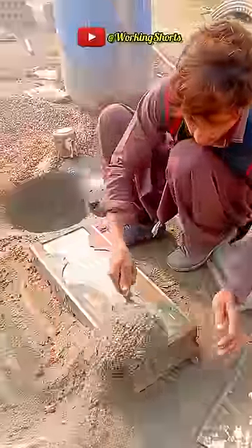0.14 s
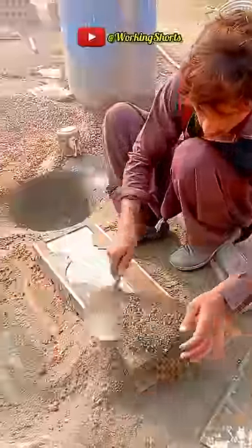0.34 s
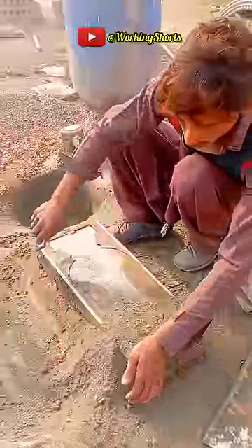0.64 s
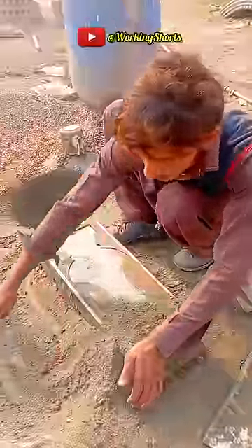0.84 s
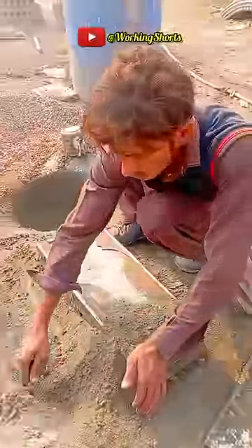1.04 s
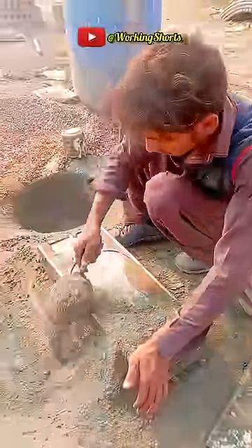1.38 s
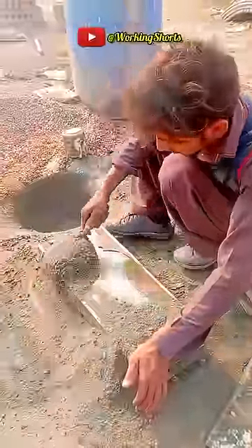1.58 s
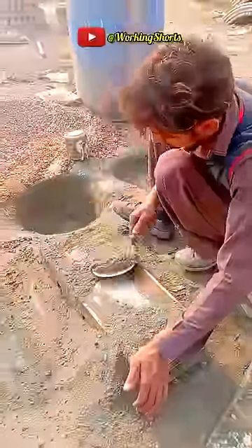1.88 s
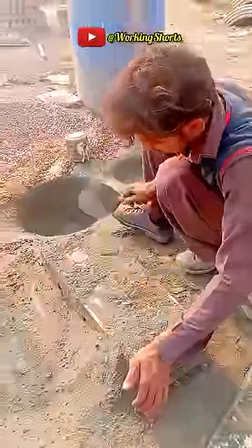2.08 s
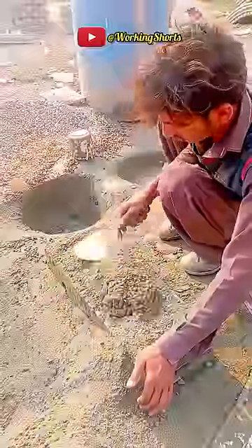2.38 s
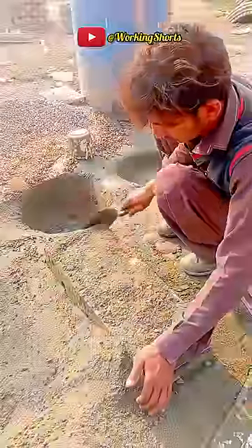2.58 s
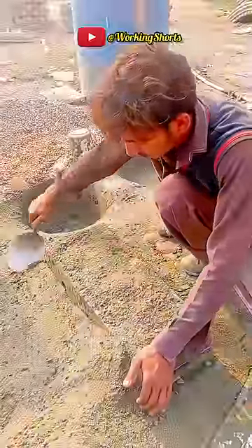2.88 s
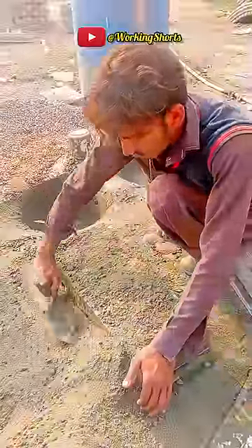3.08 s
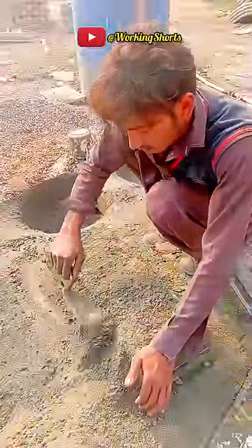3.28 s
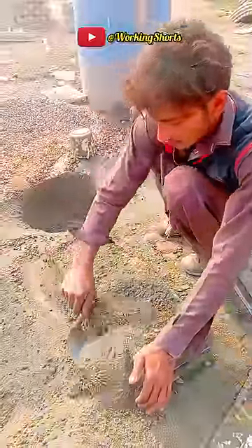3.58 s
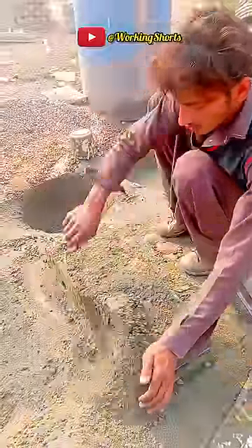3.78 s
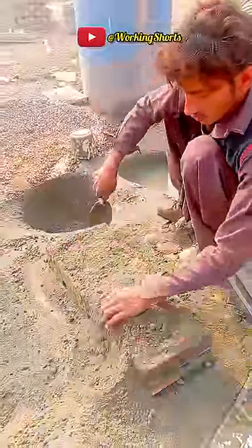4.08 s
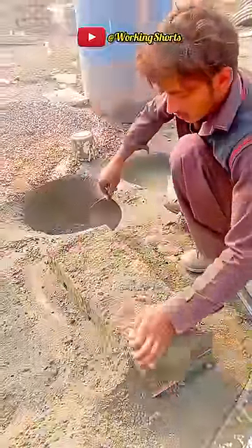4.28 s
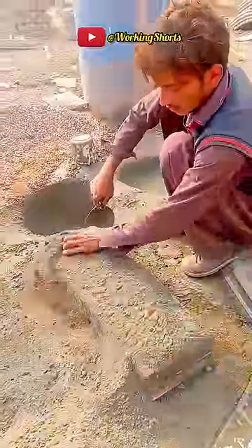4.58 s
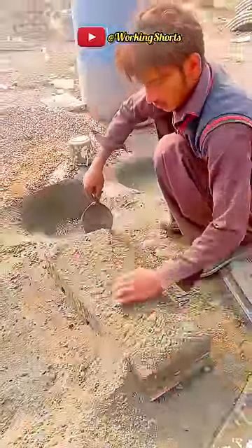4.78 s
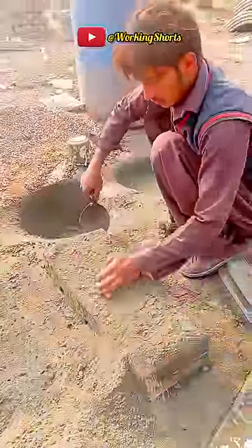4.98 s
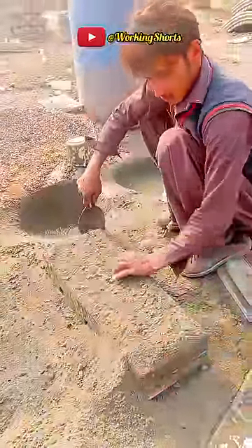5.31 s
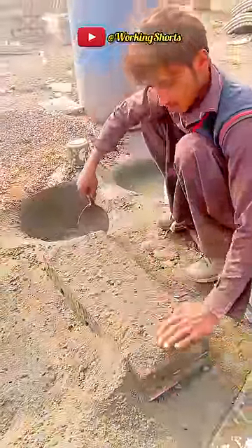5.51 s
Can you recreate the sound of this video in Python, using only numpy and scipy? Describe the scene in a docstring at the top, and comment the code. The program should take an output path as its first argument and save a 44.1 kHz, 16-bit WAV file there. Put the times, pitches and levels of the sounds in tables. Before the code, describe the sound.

In an open yard, a distant single-cylinder engine chugs as a low, soft throb of twenty to thirty beats a second, over a faint hiss. Close by, a light gritty tick comes at 0.25 s, then a steel trowel clinks on a metal mould at 0.6 s, chattering and ringing briefly. A short, rising sandy scrape follows at 0.9 s, a small swish at 1.2 s and a tick at 1.6 s. The engine slows, then jumps faster around 2.15 s. Dull thuds of concrete at 2.5-2.6 s lead into the loudest, brightest clank at 2.67 s. A longer harsh rasp swells from 2.95 to 3.2 s with soft thumps, while the engine sinks. Small scrapes and ticks come at 3.3-3.8 s, a thin, bright clink at 3.95 s, and a muffled knock at 4.17 s. Light ticks fade by 4.4 s; soft pats and gritty brushing close it from 5.1 s.

```python
"""A single-cylinder engine throbs some way off in an open work yard; close by, a steel trowel
scoops wet concrete into a metal mould. Sand grains rasp along the blade as filtered random snaps,
the blade clinks on the mould and rings in decaying modes until it is damped, loose concrete swishes
and dull thuds fall as noise bursts. The engine is one set of exhaust modes per firing, with gas
puffs and gear whine; a faint hiss lies behind."""
import sys
import numpy as np
from scipy import signal
from scipy.fft import rfft, irfft, next_fast_len
from scipy.io import wavfile
from scipy.ndimage import uniform_filter1d

SR = 44100
rng = np.random.default_rng(int(sys.argv[2]) if len(sys.argv) > 2 else 0)


def unload_audio(sound):
    """Save the sound as a 16-bit wav file, at the path given as the first command line argument."""
    columns = np.transpose(np.atleast_2d(sound))
    # keep every value between -1 and 1, then stretch to whole-number steps
    steps = np.round(np.clip(columns, -1, 1) * 32767)
    wavfile.write(sys.argv[1], SR, steps.astype(np.int16))


N = 249165
TIME = np.arange(N) / SR

# Engine speed. Each row: time in seconds, firings per second.
ENGINE_SPEED = [(0, 21.46), (.65, 21.02), (1.0, 22.83), (1.4, 23.02), (1.85, 19.36), (2.125, 18.3),
                (2.15, 30.3), (2.7, 29.76), (3.3, 23.95), (3.9, 21.98), (4.25, 22.75), (4.5, 25.76),
                (5.05, 28.8), (5.65, 20.1)]
# Likeness of the two microphones. Each row: frequency in Hz, likeness from 0 to 1.
LIKENESS = [(60, 0.89), (300, 0.88), (700, 0.46), (1500, 0.14), (3500, 0.05), (7000, 0.022), (16000, 0.062)]


def clinks(rise_s=0.00013, choke_s=0.008, yard_db=-23, yard_t60_s=0.34, ripple_db=6.0, beat_depth=0.37):
    """Each contact is a knock of the mould, a tick of steel on grit, and the blade's free ring."""
    # Blade modes. Each row: frequency in Hz, level in dB, t60 in seconds.
    blade_modes = [(1249, -16, .16), (1472, -9, .17), (1640, -11, .16), (1874, -12, .95), (2090, -12, .18),
                   (2509, -8, .13), (2709, 2, .13), (3360, -11, .12), (3564, -9, .13), (3796, -7, .39),
                   (4330, -13, .14), (4586, -1, .21), (5150, -18, .18), (5880, -17, .1), (6540, -15, .1),
                   (6820, -13, .11), (7553, -19, .15), (11670, -20, .1)]
    # Mould knock spectrum. Each row: frequency in Hz, level in dB.
    knock_spectrum = [(60, -26), (200, 6), (450, -5), (750, 1), (1000, -3.5), (1500, 1), (2800, -6.5),
                      (4500, -6.5), (8000, -21)]
    # Steel-on-grit spectrum. Each row: frequency in Hz, level in dB.
    tick_spectrum = [(500, -48), (3000, -30), (5500, -11), (7700, -2.5), (9500, 1), (11200, -2),
                     (13000, -6.5), (15000, -6.5), (17000, -26)]
    out = np.zeros((2, N))
    t = np.arange(2 * SR // 5) / SR
    hz, db, t60_s = np.transpose(blade_modes)[:, :, None]
    # higher modes reach the two microphones further out of step
    lag = np.arccos(np.clip(read(LIKENESS, hz), 0, 1))
    for s, knock_db, tick_db, contact_t60_s, ring_db, tilt_db, free_s, spot in contacts():
        phase = rng.uniform(0, 2 * np.pi, hz.shape)
        # bending waves shorten with the root of frequency; a mode struck on its node stays silent
        reach = np.cos(.2 * spot * np.sqrt(hz))
        modes = reach * amp(db + tilt_db * np.log2(hz / 3000)) * fade(t, t60_s)
        # close pairs of modes beat against each other
        beat_hz = rng.uniform(1.96, 34.3, hz.shape)
        modes = modes * (1 + beat_depth * np.sin(2 * np.pi * beat_hz * t))
        ring = np.array([(modes * np.sin(2 * np.pi * hz * t + phase + side * lag)).sum(0)
                         for side in (0, 1)])
        damping = np.exp(-np.maximum(t - free_s, 0) / choke_s)
        ring *= (1 - np.exp(-t / 0.01)) * damping
        knock = burst(t, knock_spectrum, contact_t60_s, rise_s, ripple_db / 2)
        knock = knock + amp(yard_db) * burst(t, knock_spectrum, yard_t60_s, 0.0104)
        tick = burst(t, tick_spectrum, contact_t60_s, rise_s, ripple_db)
        add(out, s, amp(knock_db) * knock + amp(tick_db) * tick + amp(ring_db) * ring)
    return out


def contacts(touches=3, rebound_s=0.0067, blow_t60_s=0.06, tap_tilt_db=16, tap_free_s=.075, tap_spot=0.867):
    """Every touch: a blow rings, then chatters in quick rebounds; a tap rings brightly and briefly."""
    # Free blade on the mould. Each row: start in seconds, knock level in dB, tick level in dB,
    # ring level in dB, ring tilt in dB per octave, seconds until damped,
    # spot struck from tip 0 to heel 1, change at each rebound in dB.
    blows = [(.5849, -12, -14, -24.5, -1, 0.31, 0.67, -9.5),
             (2.672, -9.5, -20.5, -14.5, 1, 0.275, 0.056, -8),
             (3.9452, -29.5, -11.5, -30, 8.5, .23, 0.745, -1.5),
             (4.173, -32.5, -31.5, -37, -2, 0.058, 0.95, -3.5)]
    # Loaded blade on a stone or the rim. Each row: start in seconds, tick level in dB,
    # knock level in dB, ring level in dB, contact t60 in seconds.
    taps = [(0.248, -39, -69, -75, 0.053), (0.634, -36, -35, -60, 0.038), (1.579, -27, -37.5, -71, 0.049),
            (2.143, -50, -41, -75, 0.016), (3.344, -33.5, -46, -70, .015), (3.403, -38, -41, -55.5, .07),
            (3.575, -22, -45, -63, 0.069), (3.775, -31, -41, -50, 0.058), (4.301, -36.5, -61, -76, 0.037),
            (4.341, -39, -52, -76, 0.038), (4.406, -42, -45, -56, 0.058)]
    for s, knock_db, tick_db, ring_db, tilt_db, free_s, spot, rebound_db in blows:
        for k in range(touches):
            touch_ring_db = ring_db if k == 0 else -np.inf
            change_db = k * rebound_db
            yield (s + k * rebound_s, knock_db + change_db, tick_db + change_db, blow_t60_s,
                   touch_ring_db, tilt_db, free_s, spot)
    for s, tick_db, knock_db, ring_db, t60_s in taps:
        yield s, knock_db, tick_db, t60_s, ring_db, tap_tilt_db, tap_free_s, tap_spot


def scrapes(grains_per_s=8000, spread_db=3, judder_db=3.5, plate_t60_s=0.023, ripple_db=5.5,
            cycles_per_s=5, screech_db=11, plates=3):
    """Sand grains snap against the blade, whose resonances keep shifting in a steady rotation."""
    # Strokes through the concrete. Each row: start in seconds, push in seconds,
    # release in seconds, peak pressure in dB.
    strokes = [(0.898, 0.065, .085, -20), (2.952, 0.23, .055, -21.5), (3.575, 0.011, 0.038, -29.5)]
    # Rasp spectrum. Each row: frequency in Hz, level in dB per Hz.
    rasp_spectrum = [(200, -25), (370, -12), (1500, -14), (2400, -16.5), (2750, -29.5), (3250, -10),
                     (4800, -11), (6200, -21), (7900, -3), (9200, -6.5), (12500, -8.5), (16000, -17.5)]
    pressure = sum(stroke(*row) for row in strokes)
    sizes = amp(spread_db * np.minimum(rng.exponential(1, N), 4)) * rng.choice([-1, 1], N)
    grains = sizes * (rng.random(N) < grains_per_s / SR)
    judder = amp(judder_db * unit(uniform_filter1d(rng.standard_normal(N), size=160)))  # stick and slip
    t = np.arange(SR // 16) / SR
    middle = len(t) // 2
    rasp = np.zeros((2, N))
    for k in range(plates):
        # random phases smear each snap in time; ripples give the plate its resonances
        smear = rfft(noise(len(t)) * np.roll(fade(t, plate_t60_s), middle))
        flat = irfft(smear / np.abs(smear), len(t))
        plate = unit(rippled(flat, ripple_db, spacing_hz=154.7))
        # the plates take turns
        share = np.maximum(np.cos(2 * np.pi * (cycles_per_s * TIME + k / plates)), 0)
        snaps = (grains * judder * share)[None]
        rasp += signal.oaconvolve(snaps, plate, axes=1)[:, middle:][:, :N]
    # under high pressure the steel edge screeches: this part grows with pressure squared
    screech = amp(screech_db) * unit(colour(rasp, hump(7040, 0.23))) * pressure
    return (unit(colour(rasp, rasp_spectrum)) + screech) * pressure


def stroke(start_s, push_s, release_s, peak_db, bite_s=0.0019, push_db_per_s=76, release_db=-24):
    """Pressure on the blade: the edge bites, digs in steadily, and lifts out ever faster."""
    past_peak_s = TIME - start_s - push_s
    push_part_db = push_db_per_s * np.minimum(past_peak_s, 0)
    lift_part_db = release_db * np.clip(past_peak_s / release_s, 0, 2) ** 2
    bite = np.clip((TIME - start_s) / bite_s, 0, 1)
    return bite * amp(peak_db + push_part_db + lift_part_db)


def crumbs(grit_db=3):
    """Loose concrete slides off the blade or under the hand: soft gritty noise swishes."""
    # Each row: start in seconds, length in seconds, level in dB before the fades, centre in Hz,
    # octaves from the centre to -6 dB.
    swishes = [(0.124, 0.063, -47.5, 1890, 1.14), (1.23, 0.062, -36.5, 10100, 0.35),
               (2.582, 0.093, -36.5, 4220, 2.7), (2.593, 0.36, -34, 388, 0.8),
               (2.81, 0.047, -41.5, 7760, 0.48), (4.399, 0.075, -48, 7000, 2.5),
               (5.134, 0.28, -46.5, 5500, 4), (5.407, 0.15, -42, 5860, 8.4)]
    out = np.zeros((2, N))
    for s, length_s, db, hz, octaves in swishes:
        size = int(length_s * SR)
        grit = amp(grit_db * unit(uniform_filter1d(rng.standard_normal(SR), size=60)))
        swish = unit(colour(noise(SR) * grit, hump(hz, octaves)))[:, :size]
        add(out, s, amp(db) * swish * np.sqrt(np.hanning(size)))
    return out


def thuds(octaves=0.61, rise_s=0.00037):
    """Soft low blows with no ring: decaying noise around one pitch."""
    # Each row: start in seconds, level in dB, pitch in Hz, t60 in seconds.
    dull_blows = [(2.47, -28, 93, 1), (2.602, -19.5, 280, 0.26), (2.616, -22.5, 410, 0.18),
                  (3.041, -23, 267, 0.27), (3.073, -20, 320, 0.067), (4.172, -26, 206, 0.099),
                  (5.253, -32, 274, 0.57), (5.386, -27, 101, 1), (5.436, -29.5, 356, 0.38)]
    out = np.zeros((2, N))
    t = np.arange(SR // 2) / SR
    for s, db, hz, t60_s in dull_blows:
        add(out, s, amp(db) * burst(t, hump(hz, octaves), t60_s, rise_s))
    return out


def engine(boom_db=-1, bark_db=-2, gas_db=-6, puff_turns=1.0, rumble_db=-11, pull_db=1.3):
    """One pulse a firing: a low boom always; a harder bark, puffs of gas and gear whine under load."""
    # Low exhaust modes. Each row: frequency in Hz, level in dB, t60 in seconds.
    pipe_modes = [(68.4, -25, 0.044), (108.7, -3, 0.11), (135.8, -11.5, 0.13)]
    # Upper exhaust modes. Each row: frequency in Hz, level in dB, t60 in seconds.
    bark_modes = [(165.3, 4, 0.13), (214.5, -1, 0.24), (259.8, -2, 0.18), (328.5, -10, 0.15),
                  (465, -14, 0.21), (556, -9, 0.077)]
    # Exhaust puff spectrum. Each row: frequency in Hz, level in dB.
    gas_spectrum = [(100, -9), (200, 5.5), (300, -1.5), (450, -11.5), (650, -12), (900, -21), (1500, -26.5),
                    (4000, -38)]
    turns = .13 + np.cumsum(along(ENGINE_SPEED)) / SR  # one turn per firing
    firings_s = TIME[np.diff(np.floor(turns), prepend=-1) > 0]
    puffs = unit(colour(noise(N) * (.5 + np.exp(-(turns % 1) / puff_turns)), gas_spectrum))
    rumble = unit(colour(noise(N), hump(85, 0.87)))  # scattered around the yard
    boom = amp(boom_db) * exhaust(firings_s, pipe_modes, rise_s=0.0069, uneven_db=2.5, detune=0.069)
    boom = boom + amp(rumble_db) * rumble
    bark = amp(bark_db) * exhaust(firings_s, bark_modes, rise_s=0.0031, uneven_db=3.5, detune=0.046)
    bark = bark + amp(gas_db) * puffs + whine(turns)
    # the boom swells while the engine gains speed
    boom_gain = background(idle_db=-38.5, load_db=2.1, dip_share=0.68) * amp(pull_db * pull())
    bark_gain = background(idle_db=-49, load_db=13.56, dip_share=0.48)
    return boom_gain * boom + bark_gain * bark


def exhaust(firings_s, modes, rise_s, uneven_db, detune):
    """Each firing rings the exhaust; the hot gas shifts its modes a little from one to the next."""
    out = np.zeros((1, N))
    t = np.arange(SR // 9) / SR
    hz, db, t60_s = np.transpose(modes)[:, :, None]
    shape = amp(db) * fade(t, t60_s) * (1 - np.exp(-t / rise_s))
    chance = rng.standard_normal((len(firings_s), 2, len(modes), 1))
    for s, (level, shift) in zip(firings_s, chance):
        tone = np.sin(2 * np.pi * hz * (1 + detune * shift) * t)
        ring = amp(uneven_db * level) * shape * tone
        add(out, s, ring.sum(0, keepdims=True))
    return unit(out)


def whine(turns):
    """Gear teeth mesh at multiples of the firing rate, with a wandering phase."""
    # Each row: multiple of the firing rate, level in dB, line width in Hz.
    gears = [(21.12, -22, 13.9), (107.2, -29.5, 172)]
    wander = np.cumsum(rng.standard_normal(N)) * np.sqrt(2 * np.pi / SR)
    return sum(amp(db) * unit(np.sin(2 * np.pi * k * turns + np.sqrt(width_hz) * wander))
               for k, db, width_hz in gears)


def load(idle_rate=21.07, full_rate=27.73):
    """How hard the engine works, 0 to 1 between two firing rates (per second)."""
    return np.clip((along(ENGINE_SPEED) - idle_rate) / (full_rate - idle_rate), 0, 1)


def pull(full_gain=2.8):
    """Towards -1 as the engine slows, +1 as it gains speed; full_gain in firings per s, per s."""
    gaining = np.gradient(along(ENGINE_SPEED)) * SR
    return uniform_filter1d(np.tanh(gaining / full_gain), size=SR // 2)


def yard(waver_db=1.6):
    """A faint, slightly wavering outdoor hiss of filtered noise."""
    # Hiss spectrum. Each row: frequency in Hz, level in dB per Hz.
    hiss_spectrum = [(250, -5), (450, 0), (1060, -6), (1760, -7), (2840, -5.5), (4500, -8), (7400, -3.5),
                     (9900, -3.5), (16000, -21)]
    # Stereo balance. Each row: frequency in Hz, left minus right in dB.
    hiss_balance = [(500, 3), (2000, -1), (4500, -2), (7500, -9.5), (11000, 6), (15000, -17.5)]
    waver = amp(waver_db * unit(uniform_filter1d(rng.standard_normal(N), size=1500)))
    hiss = unit(colour(rippled(noise(N), ripple_db=-0.5, spacing_hz=315), hiss_spectrum))
    return shade(hiss, hiss_balance) * waver * background(idle_db=-53, load_db=0.97, dip_share=1)


def background(idle_db, load_db, dip_share):
    """Layer gain: rises with the engine's load, sinks in a few dips, two short and one long."""
    # Each row: deepest point in seconds, depth in dB, fall in seconds, recovery in seconds.
    dips = [(.67, 5, 0.094, 0.065), (1.83, 3, 0.29, 0.23), (3.22, 11, 0.36, 1.22)]
    dip_db = sum(along([(s - fall_s, 0), (s, depth_db), (s + recovery_s, 0)])
                 for s, depth_db, fall_s, recovery_s in dips)
    return amp(idle_db + load_db * load() - dip_share * dip_db)


def amp(db):
    """Decibels to gain."""
    return 10 ** (np.asarray(db) / 20)


def unit(x):
    """Scales to rms 1."""
    return x / np.sqrt(np.mean(x ** 2) + 1e-20)


def along(curve):
    """A curve of (s, value) at every sample."""
    return np.interp(TIME, *np.transpose(curve))


def read(points, hz):
    """A table of (Hz, value) on a log-frequency axis."""
    f, value = np.transpose(points)
    return np.interp(np.log(hz + 1), np.log(f + 1), value)


def add(mix, s, sound):
    """Mixes a sound in at time s."""
    part = mix[:, max(0, round(s * SR)):][:, :sound.shape[1]]
    part += sound[:, :part.shape[1]]


def colour(x, points, scale=1):
    """Filters by a spectrum in dB."""
    size = next_fast_len(x.shape[-1], real=True)
    gain = amp(scale * read(points, np.fft.rfftfreq(size, 1 / SR)))
    return irfft(rfft(x, size) * gain, size)[..., :x.shape[-1]]


def shade(x, points):
    """Splits a left-right level difference between the two microphones."""
    return colour(x, points, np.array([[.5], [-.5]]))


def noise(size):
    """White noise at two microphones: alike in the bass, nearly unrelated in the treble."""
    a, b = rfft(rng.standard_normal((2, size)))
    same = np.clip(read(LIKENESS, np.fft.rfftfreq(size, 1 / SR)), 0, 1)
    return irfft(np.array([a, same * a + np.sqrt(1 - same ** 2) * b]), size)


def hump(hz, octaves):
    """A bell-shaped spectrum around hz, 6 dB down at the given octaves either side."""
    return [(hz * 2 ** (k * octaves), -6 * k * k) for k in range(-4, 5)]


def fade(t, t60_s):
    """Exponential decay by 60 dB in t60_s."""
    return np.exp(-np.log(1000) * t / t60_s)


def burst(t, spectrum, t60_s, rise_s, ripple_db=0):
    """A coloured burst that dies away, of the same energy whatever its grain."""
    shape = fade(t, t60_s) * (1 - np.exp(-t / rise_s))
    grain = colour(rippled(noise(len(t)), ripple_db), spectrum)
    return unit(grain * shape) * np.sqrt(np.mean(shape ** 2))


def rippled(x, ripple_db, spacing_hz=230):
    """Random peaks and dips in the spectrum, as from crowded, quickly damped resonances."""
    hz = np.arange(0, SR / 2, spacing_hz)
    heights = np.clip(rng.standard_normal(len(hz)), -2, 2)
    return colour(x, np.transpose([hz, ripple_db * heights]))


def scene():
    """Trowel close by with its own stereo balance; engine in the middle; hiss behind."""
    # Trowel balance. Each row: frequency in Hz, left minus right in dB.
    trowel_balance = [(100, -12), (600, 3.5), (1800, -3.5), (4400, -7.5), (7500, -15), (10000, 0),
                      (15000, -13)]
    trowel = shade(clinks() + scrapes(), trowel_balance)
    return trowel + crumbs() + thuds() + engine() + yard()


def record(dry, low_hz=48, edge_hz=16050):
    """The microphone's bass roll-off, the full-scale limit, then the band limit."""
    thin = signal.sosfilt(signal.butter(3, low_hz, "high", fs=SR, output="sos"), dry)
    lowpass = signal.firwin(401, edge_hz, window=("kaiser", 8), fs=SR)
    return signal.oaconvolve(np.clip(thin, -1, 1), lowpass[None], "same")


dry = scene()
out = record(dry)
unload_audio(out)
```